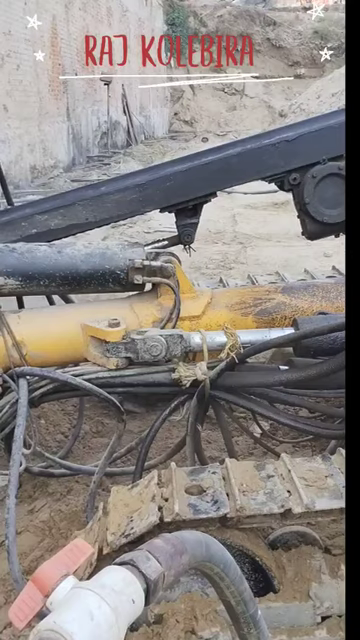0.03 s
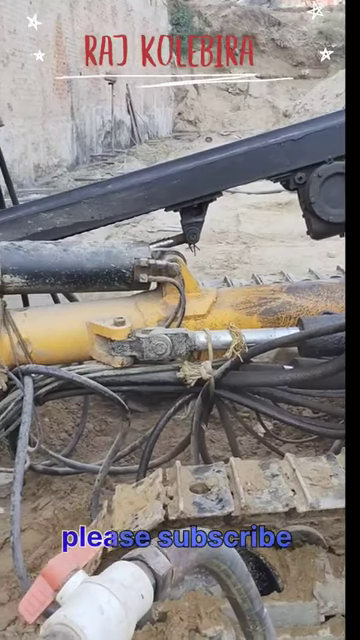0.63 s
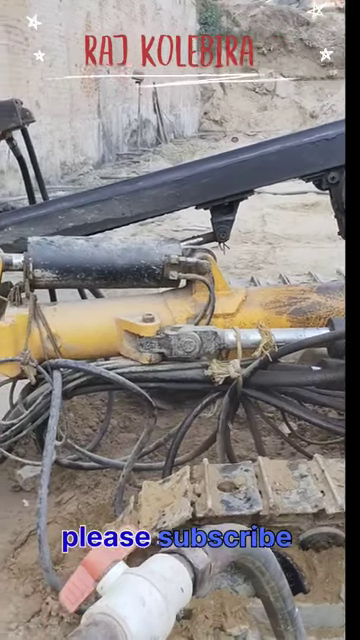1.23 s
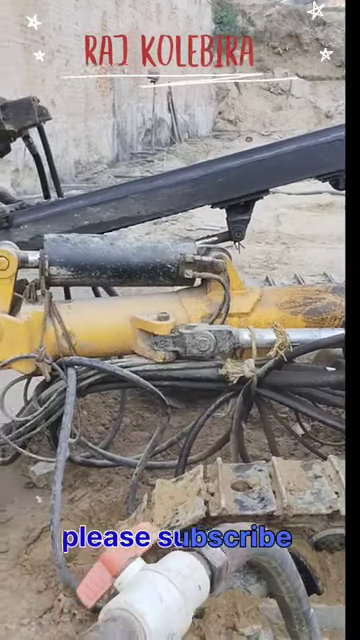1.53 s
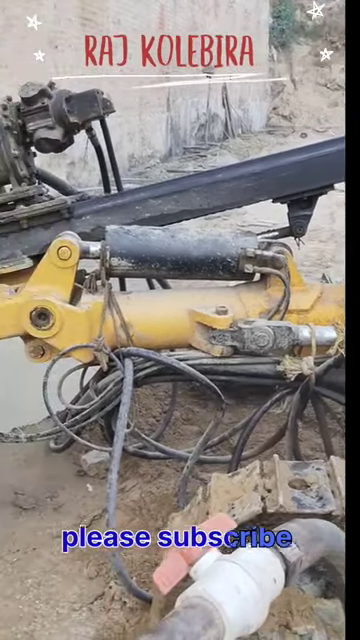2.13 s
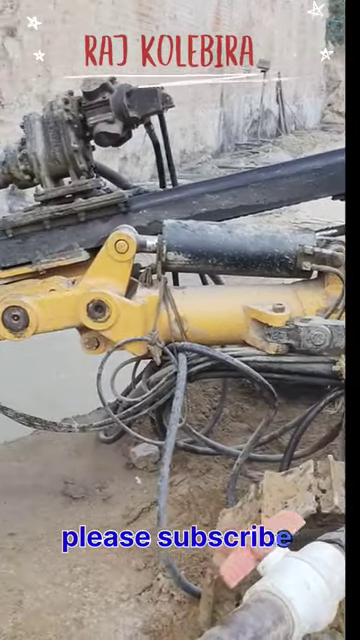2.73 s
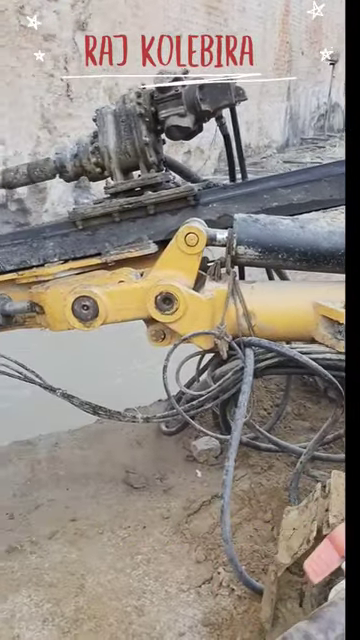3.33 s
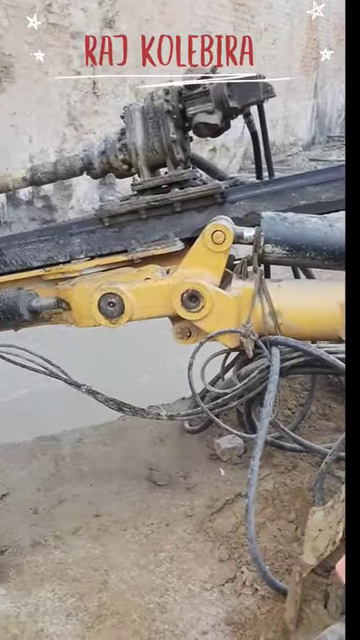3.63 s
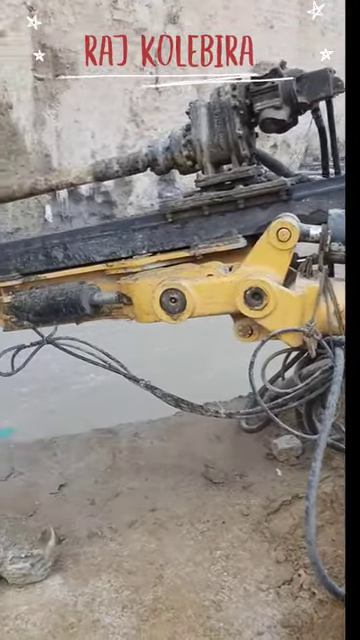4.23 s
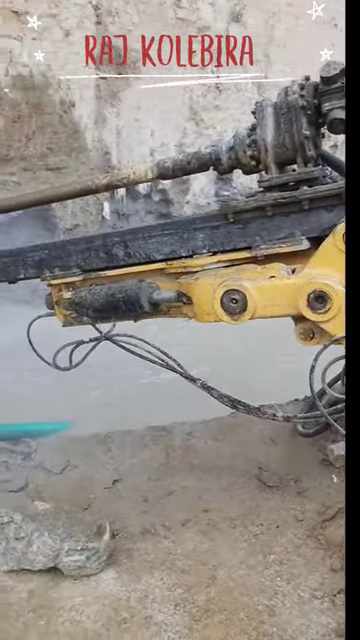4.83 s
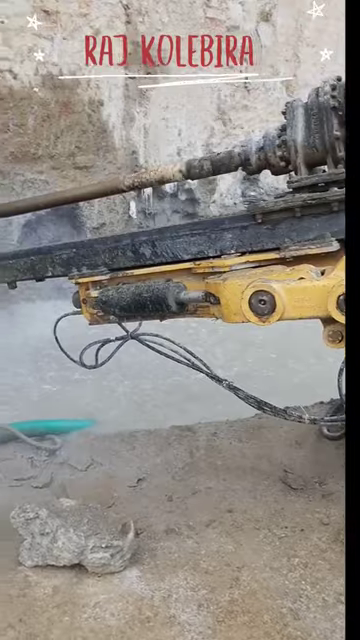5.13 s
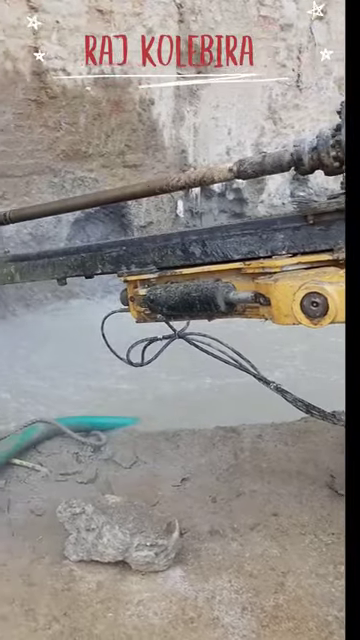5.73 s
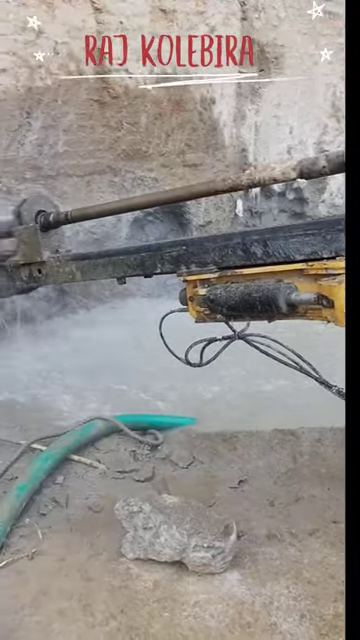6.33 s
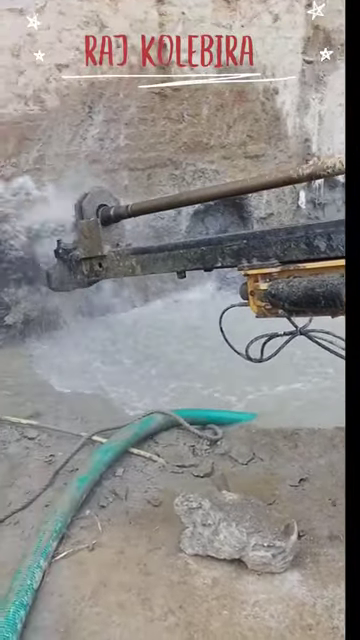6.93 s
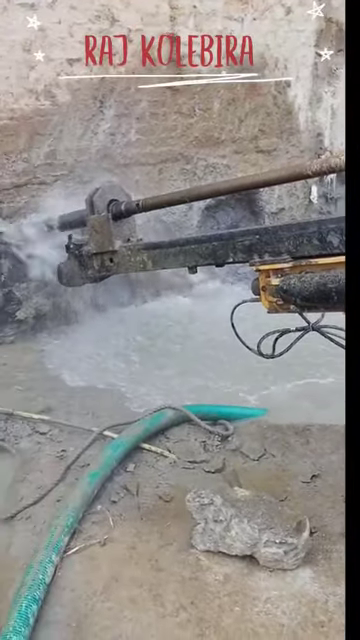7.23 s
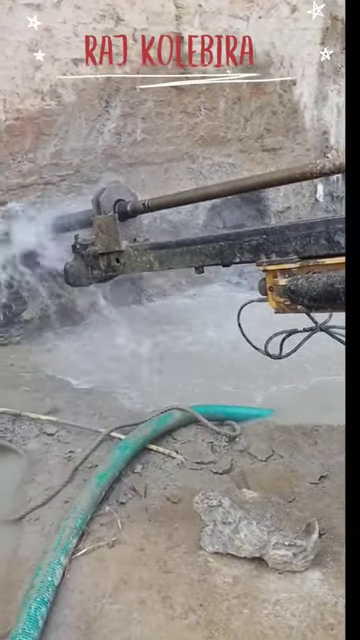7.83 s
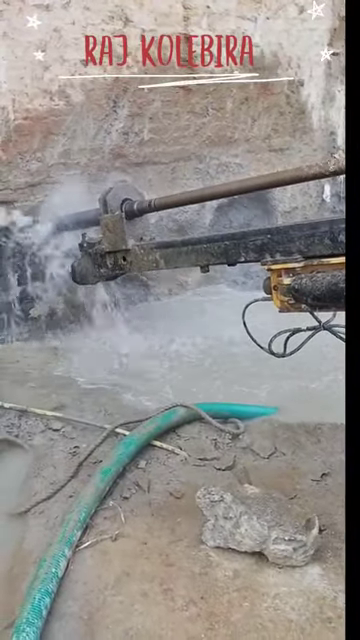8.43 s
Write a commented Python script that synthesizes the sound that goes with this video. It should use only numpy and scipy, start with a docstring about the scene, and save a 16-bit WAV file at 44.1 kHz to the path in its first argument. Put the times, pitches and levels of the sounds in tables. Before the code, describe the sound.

Fast, steady hammering of a drilling rig against a concrete wall, with rattling metal, a squeaking rod, spraying water and a rumbling engine.

```python
"""A hydraulic rock drill hammers a steel rod into a concrete wall, nearly 18 blows a second.
Each blow knocks the beam that carries the drill and sets the steelwork clattering; the piston thumps
back through the boom (the drill's arm), and the turning rod squeals in its guide. Flushing water
sprays from the hole, the engine rumbles, and the pit's walls echo. The whole sound swells once at
the start, and the listener slowly turns toward the bit."""
import sys
import numpy as np
from scipy import signal
from scipy.fft import rfft, irfft, next_fast_len
from scipy.io import wavfile
from scipy.ndimage import map_coordinates

SR = 44100
rng = np.random.default_rng(int(sys.argv[2]) if len(sys.argv) > 2 else 0)


def pcm_store(signal):
    """Save signal as 16-bit PCM."""
    levels = np.round(np.clip(np.atleast_2d(signal), -1, 1) * 32767)
    wavfile.write(sys.argv[1], SR, levels.astype(np.int16).T)


N = 378378
TIME = np.arange(N) / SR

# Loose parts rattle at the blow, and again as the piston returns.
# Each row: seconds after the blow, relative level in dB.
RATTLE_SHAPE = [(0, 2.5), (.001, -0.5), (.006, 1.5), (.021, -2.5), (.026, 1.5), (.031, -4.5), (.038, -10),
                (.057, -7.5)]
# Water spurts after a blow. Each row: seconds after the blow, relative level in dB.
SPURT_SHAPE = [(0, -19), (.002, 3), (.008, 5.5), (.027, 2.5), (.038, 0.5), (.057, -2)]


def amp(db):
    """Turn decibels into a number to multiply by."""
    return 10 ** (np.asarray(db) / 20)


def unit(x):
    """Scale a sound to an average strength (rms) of 1."""
    return x / np.sqrt(np.mean(x ** 2) + 1e-20)


def along(points, hz):
    """Read a table of frequencies and values at hz, with octaves evenly spaced."""
    table_hz, values = np.transpose(points)
    return np.interp(np.log(hz + 1), np.log(table_hz + 1), values)


def curves(rows, at=TIME):
    """Join a table's rows with straight lines: one curve for each column after the time."""
    times, *columns = np.transpose(rows)
    return [np.interp(at, times, column) for column in columns]


def wobble(rate, count=8):
    """A smooth random curve through rate new values a second."""
    knots = rng.standard_normal(int(N * rate / SR) + 4)
    steps = np.arange(len(knots) * count) / count
    return np.interp(TIME * rate, steps, map_coordinates(knots, [steps], mode="nearest"))


def each(blow):
    """A random value that holds until the next blow."""
    return rng.standard_normal(blow[-1] + 1)[blow]


def swell(start_s, rise_s, hold_s, fall_s):
    """A curve that rises from 0 to 1, holds and falls back."""
    return np.interp(TIME, start_s + np.cumsum([0, rise_s, hold_s, fall_s]), [0, 1, 1, 0])


def filtered(x, response):
    """Multiply each frequency in x by response(hz)."""
    size = next_fast_len(N + SR // 4)
    return irfft(rfft(x, size) * response(np.fft.rfftfreq(size, 1 / SR)), size)[..., :N]


def peaks(modes, hz):
    """How much power ringing parts pass at hz; each has a pitch, a width and a level."""
    return sum(amp(db) ** 2 * (hz * width) ** 2 / ((pitch ** 2 - hz ** 2) ** 2 + (hz * width) ** 2)
               for pitch, width, db in modes)


def noise(colour):
    """Stereo noise shaped by colour(hz), alike in both ears in the bass, less so in the treble."""
    # Each row: frequency in Hz, how alike the ears are (1 means the same).
    likeness = [(100, 1), (200, 1), (400, 0.82), (750, 1), (1800, 0.13), (3000, 0.076), (6000, 0.56),
                (7200, 0.37), (10000, 0.12), (15000, 0.091)]
    def response(hz):
        spread = np.arccos(np.clip(along(likeness, hz), -1, 1 - 1 / 64)) / 2
        return colour(hz) * np.array([np.cos(spread), np.sin(spread)])
    mid, side = filtered(rng.standard_normal((2, N)), response)
    return unit(np.array([mid + side, mid - side]))


def hum(hz, width, alike):
    """One part kept ringing by random small hits, in stereo."""
    common, apart = signal.lfilter(*signal.iirpeak(hz, hz / width, SR), rng.standard_normal((2, N)))
    side = np.sqrt((1 - min(alike, 1)) / (1 + alike)) * apart
    return unit(np.array([common + side, common - side]))


def panned(x, left_db, lead_s):
    """Make x louder and earlier on the left; negative values favour the right."""
    shift = lead_s * SR / 2
    ears = zip((1, -1), np.broadcast_to(x, (2, N)))
    return np.array([amp(side * left_db / 2) * map_coordinates(ear, [np.arange(N) + side * shift])
                     for side, ear in ears])


def pit_echo(x, count=30):
    """The pit's walls throw the sound back in a short, blurred echo that keeps varying at random."""
    # Each row: frequency in Hz, seconds the echo takes to fade by 60 dB.
    fade_times = [(100, 0.067), (800, 0.29), (8000, 0.36)]
    hop, length = N // count + 1, SR // 4
    out = np.zeros((2, N + 4 * hop + length))
    padded = np.pad(x, (hop, 3 * hop))
    for start in range(0, N + hop, hop):
        hz, t, spectrum = signal.stft(rng.standard_normal((2, length)), SR, nperseg=256)
        fade = amp(-60 * t / along(fade_times, hz)[:, None])
        tail = signal.istft(spectrum * fade, SR, nperseg=256)[1][:, :length]
        piece = padded[start:start + 2 * hop] * signal.windows.cosine(2 * hop)
        echo = signal.fftconvolve(piece[None], tail / np.linalg.norm(tail[0]), axes=1)
        out[:, start:start + echo.shape[1]] += echo
    return out[:, hop:hop + N]


def air_puff(peak_s=0.635, ramp_s=0.019, top_hz=85):
    """A puff of air makes one soft, low bump."""
    rumble = noise(lambda hz: 1 / (1 + (hz / top_hz) ** 4))
    return amp(-27) * rumble * swell(peak_s - ramp_s, ramp_s, 0, ramp_s)


def engine():
    """The engine rumbles, its level wavering."""
    # Each row: frequency in Hz, relative level in dB.
    spectrum = [(20, -33), (45, -33), (75, 4), (135, 2.5), (220, -0.5), (300, -2.5), (410, -10),
                (700, -1.5), (1500, -21), (5000, -11.5), (15000, -47)]
    return noise(lambda hz: amp(along(spectrum, hz))) * amp(1.6 * wobble(10))


def thump(blow, first_s=0.0011, first_gain=0.47, return_s=0.02524):
    """The boom jolts at the blow, and harder about half a cycle later when the oil reverses."""
    # Each row: frequency in Hz, relative level of the jolt in dB.
    spectrum = [(30, -39), (60, -15.5), (85, -3), (130, 1), (170, -1.5), (212, -4.5), (260, -10.5),
                (360, -18.5), (600, -41)]
    kicks = np.diff(blow, prepend=0) * amp(0.76 * each(blow))
    def two_jolts(hz):
        delays = first_gain * np.exp(-2j * np.pi * hz * first_s) + np.exp(-2j * np.pi * hz * return_s)
        return 1j * amp(along(spectrum, hz)) * delays  # 1j: each jolt both pushes and pulls the air
    return unit(filtered(kicks, two_jolts))


def boom(blow):
    """The boom thumps with the piston and drones along; the engine rumbles through it."""
    # Each row: time in seconds, relative levels of the thump and of the drone in dB.
    levels = [(1.0, -37, -46.5), (2.3, -36.5, -41), (2.8, -44.0, -45.5), (3.3, -44, -52), (5.3, -42, -52),
              (6.5, -44.5, -42.5), (6.8, -43.0, -52.5), (7.5, -43, -45.5), (8.5, -43, -49)]
    thump_db, drone_db = curves(levels)
    drone = amp(drone_db - 1) * noise(lambda hz: peaks([(296, 65, 0)], hz))
    rumble = amp(thump_db - 3) * engine()
    return amp(thump_db - 1.1) * thump(blow) + rumble + drone


def water_spray(blow, age):
    """Flushing water spurts from the hole and breaks into drops."""
    # Each row: time in seconds, relative level in dB.
    levels = [(1.0, -32), (2.2, -31), (3.6, -36.5), (4.7, -44.5), (5.2, -41), (6.5, -45.5), (6.8, -35.5),
              (7.1, -38), (7.3, -32), (7.5, -36.5), (8.3, -35.5), (8.5, -38.5)]
    # Each row: frequency in Hz, relative level of the hiss in dB.
    spectrum = [(500, -30), (2000, -3), (5000, -1.5), (8000, -3.5), (9600, -1), (11000, -0.5), (13800, 0.5),
                (15500, -6)]
    # Thin high tones: one whistles in the spray, the other rings an octave above the rod's squeal. Each row:
    # pitch in Hz, width in Hz, dB above the hiss.
    whistles = [(9640, 66, 8), (14400, 40, 11)]
    hiss = noise(lambda hz: amp(along(spectrum, hz)) * np.sqrt(1 + peaks(whistles, hz)))
    spurt_db = curves(SPURT_SHAPE, age)[0] + 1.8 * each(blow)
    drops_db = 2 * wobble(1300)
    return amp(curves(levels)[0] + 3) * unit(hiss * amp(spurt_db + drops_db))


def squeal(blow, age, pitch_hz=7157, waver_hz=45, loudest_s=0.023):
    """The rod sings while it slides in its guide between blows."""
    # Each row: pitch in Hz, width in Hz, relative level in dB.
    rod_tones = [(7114, 40, 16.5), (7060, 120, 1.5), (14250, 70, -32)]
    slide_db = 1.5 * np.cos(2 * np.pi * (age - loudest_s) / np.percentile(age, 99))
    tone = np.sin(2 * np.pi * np.cumsum(pitch_hz + waver_hz * wobble(130)) / SR)
    scrape = noise(lambda hz: np.sqrt(peaks(rod_tones, hz)) / (1 + (np.maximum(6500 - hz, 0) / 700) ** 2))
    flicker = amp(1.1 * wobble(60))
    return unit((0.5 * flicker * tone + scrape) * amp(slide_db + 2 * each(blow)))


def chirps(blow, age, start_hz=7650, climb_hz_per_s=15000):
    """The rod sticks and slips: a higher, raspy squeak climbs anew after each blow."""
    # Each row: pitch in Hz, width in Hz, relative level in dB.
    rasp_bands = [(8030, 720, 2.5), (7100, 370, -3), (5000, 270, -5), (9400, 1300, -12)]
    pitch_hz = start_hz + climb_hz_per_s * age + 170 * each(blow) + 110 * wobble(400)
    tone = np.sin(2 * np.pi * np.cumsum(pitch_hz) / SR)
    def rasp_colour(hz):
        edge_cut = 1 + (4800 / (hz + 1)) ** 12 + (hz / 10000) ** 12
        return np.sqrt(peaks(rasp_bands, hz) / edge_cut)
    squeak = 1.4 * noise(rasp_colour) + tone * amp(3 * each(blow))
    return unit(squeak * amp(curves(SPURT_SHAPE, age)[0] + 2.9 * wobble(150)))


def rubbing_rod(blow, age):
    """Squeal and chirps both grow with the rubbing, and change level whenever the rod catches."""
    # Each row: time in seconds, relative level of the rubbing in dB.
    rubbing = [(1.0, -34.5), (2.4, -30.5), (3.8, -32.5), (4.7, -41.5), (6.4, -42.0), (6.8, -39),
               (7.6, -41.5), (8.5, -39)]
    # Each row: start in seconds, length in seconds, dB added to the squeal, dB added to the chirps.
    catches = [(1.56, 0.41, 5, -1), (2.03, 0.086, 8.5, -2), (2.28, .1, -1, 3.5), (2.53, 0.11, 2, 2.5),
               (3.156, 0.083, 8, 2.5), (4.0, 0.16, 7, -0.5), (4.853, .39, 10, 0), (6.706, 0.22, 9.5, 1),
               (7.174, 0.11, 6.5, 2)]
    rise_s, fall_s = 0.065, 0.091
    swells = np.array([swell(start - rise_s, rise_s, length, fall_s) for start, length, _, _ in catches])
    squeal_db, chirp_db = curves(rubbing)[0] + np.transpose(catches)[2:] @ swells
    return amp(squeal_db - 1) * squeal(blow, age) + amp(chirp_db) * chirps(blow, age)


def clatter(blow, age):
    """Couplings, chain and guides rattle in a dense burst of small hits after every blow."""
    # Each row: frequency in Hz, relative level of the hits in dB.
    spectrum = [(150, -23), (300, -3), (430, -2.5), (700, 4), (1250, -2.5), (2000, -10), (2700, -1.5),
                (4500, -8.5), (7000, 1.5), (9500, -6), (15000, -11.5)]
    # The loose parts ring. Each row: pitch in Hz, width in Hz, relative level in dB.
    steel_tones = [(2410, 130, 1), (2946, 300, 4), (3240, 92, 2), (3810, 320, 2), (4370, 170, 1),
                   (5360, 120, 5), (6025, 42, 10)]
    hits = noise(lambda hz: amp(along(spectrum, hz)))
    # Which part rings most drifts as the rod turns.
    ringing = sum(amp(db + 2 * each(blow) + 0.63 * wobble(0.93))
                  * np.sqrt(width) * hum(hz, width, alike=0.4) for hz, width, db in steel_tones)
    burst = amp(curves(RATTLE_SHAPE, age)[0] + 1.7 * each(blow))
    return unit((hits + amp(-2.5) * unit(ringing)) * burst)


def clank(blow, age):
    """Each blow shakes the boom's plates in a slightly different mix."""
    # Each row: pitch in Hz, width in Hz, relative level in dB.
    plate_tones = [(1134, 38, 0), (1398, 180, 4), (1562, 91, 2), (1749, 45, 3.5), (1965, 160, -0.5)]
    # Each row: seconds after the blow, relative level in dB.
    shudder = [(0, -5), (.0015, 3), (.006, 3), (.012, -2.5), (.021, -4), (.027, -0.5), (.036, -9.5),
               (.057, -12.5)]
    plates = sum(amp(db + each(blow)) * np.sqrt(width) * hum(hz, width, alike=0.71)
                 for hz, width, db in plate_tones)
    return unit(plates * amp(curves(shudder, age)[0]))


def steelwork(blow, age, surge):
    """Plates clank, loose parts clatter, and the rod's coupling rings, more or less as it turns."""
    # Each row in both tables: time in seconds, relative level in dB.
    clank_levels = [(1.0, -40.5), (1.7, -36.5), (2.1, -40), (2.5, -35.0), (3.3, -44), (3.9, -38.5),
                    (4.4, -43.5), (5.2, -42.5), (5.6, -39.0), (6.0, -43.5), (6.6, -42), (7.9, -42),
                    (8.5, -48)]
    clatter_levels = [(1.0, -31), (3.0, -30.5), (4.7, -39), (5.2, -38.0), (6.5, -40), (6.8, -37),
                      (7.3, -36), (7.8, -37), (8.5, -36)]
    clank_db = curves(clank_levels)[0] + 3.5 * surge
    clatter_db, = curves(clatter_levels)
    coupling = hum(2285, 53, alike=0.59)
    coupling *= amp(curves(RATTLE_SHAPE, age)[0] + 2 * each(blow) + 2.7 * wobble(4))
    loose_parts = amp(clatter_db + 2.5) * clatter(blow, age) + amp(clatter_db - 10) * unit(coupling)
    return loose_parts + amp(clank_db) * clank(blow, age)


def ring(modes, blow, age, scatter_db, detune, rise_s):
    """A struck part's tones build up fast and fade, a little differently at each blow."""
    tone = sum(amp(db + scatter_db * each(blow) - 60 * age / fade_s)
               * np.sin(2 * np.pi * hz * (1 + detune * each(blow)) * age) for hz, db, fade_s in modes)
    attack = 1 - np.exp(-age / rise_s)
    release = np.clip((age.max() - age) / 0.006, 0, 1)
    return unit(tone * attack * release)


def hammer(first_s=0.41507, period_s=0.05663):
    """The hammer's beat: for every sample, the latest blow's number and its age in seconds."""
    # It labours twice and catches up. Each row: time in seconds, seconds behind the beat.
    lag = [(.47, 0), (1, .0018), (1.44, .005), (2.23, .0056), (3.1, .0015), (4.5, .0019), (5.06, .0054),
           (5.35, .0094), (5.69, .0085), (6.45, .0023), (7.8, 0)]
    beats = np.arange(first_s, TIME[-1], period_s)
    times = beats + curves(lag, beats)[0]
    blow = np.maximum(np.searchsorted(times, TIME) - 1, 0)
    return blow, np.maximum(TIME - times[blow], 0)


def knock(blow, age, round_trips_per_s=752):
    """The blow bounces between the rod's ends and rings the beam, the drill's cradle and the bit."""
    # Each row: time in seconds, then relative levels in dB of the whole knock, its cradle and its bit.
    levels = [(1.0, -31, -8, -12), (2.0, -33.5, -7, -3), (2.8, -34.5, -8.0, -8.5), (3.1, -37, -8.5, -8),
              (4.0, -35, -2.5, -6), (4.3, -38, -6.5, -11), (4.7, -36.5, -14, -9.5), (4.9, -39, -9.5, -6.5),
              (6.4, -34.5, -10.5, -12), (6.7, -35.5, -2.5, -7), (8.5, -33.5, -9.0, -2)]
    # The bit's ring sinks and recovers as it settles in. Each row: time in seconds, pitch in Hz.
    bit_pitch = [(1.7, 1105), (2.4, 1044), (4.2, 1023), (4.8, 940), (5.5, 930), (6.4, 1133), (8.5, 1084)]
    # The wave in the rod dies away. Each row: seconds after the blow, relative level in dB.
    wave_fade = [(0, 0), (.0035, -0.5), (.005, 0), (.007, -7), (.009, -14), (.014, -17), (.022, -23),
                 (.057, -36)]
    # Each row: pitch in Hz, relative level in dB, seconds to fade by 60 dB.
    beam_tones = [(684, 6, 0.031), (767, -2.5, 0.05), (815.6, -3, 0.11)]
    knock_db, cradle_db, bit_db = curves(levels)
    bit_hz, = curves(bit_pitch)
    cradle_tones = [(601.5, 0, 0.04)]
    bit_tones = [(bit_hz, 0, 0.055), (bit_hz * 0.95, -3, 0.045)]
    phase = 2 * np.pi * round_trips_per_s * (1 + 0.022 * each(blow)) * age
    wave = unit(np.sin(phase) * amp(curves(wave_fade, age)[0] + 0.3 * each(blow)))
    beam = ring(beam_tones, blow, age, scatter_db=3, detune=0.029, rise_s=0.0038)
    cradle = ring(cradle_tones, blow, age, scatter_db=1.5, detune=0.017, rise_s=0.0068)
    bit = ring(bit_tones, blow, age, scatter_db=1.5, detune=0.026, rise_s=0.005)
    ringing = amp(-10) * beam + amp(cradle_db - 2.5) * cradle + amp(bit_db - 2.5) * bit
    direct = amp(knock_db) * (amp(-2) * wave + ringing)
    return panned(direct, left_db=-0.3, lead_s=0.00013) + amp(-6) * pit_echo(direct)


def scene():
    """The drill's layers share the hammer's beat and the opening swell."""
    # The listener turns. Each row: time in seconds, the left ear's head start in seconds.
    bearing = [(.5, 7.5e-5), (1.5, 6e-5), (2.5, 3.5e-5), (3.7, -1e-5), (5.5, -3.5e-5), (7.5, -6.5e-5)]
    lead_s, = curves(bearing)
    blow, age = hammer()
    surge = swell(start_s=0.31, rise_s=0.25, hold_s=0.19, fall_s=0.26)
    water = water_spray(blow, age)
    steel = panned(steelwork(blow, age, surge), left_db=-0.2, lead_s=lead_s)
    water_and_rod = panned(water + rubbing_rod(blow, age), left_db=2.5, lead_s=lead_s)
    drilling = knock(blow, age) + steel + water_and_rod
    return amp(11 * surge) * drilling + amp(10.5 * surge) * boom(blow) + air_puff()


def record(dry):
    """The sound cuts in suddenly, its tallest peaks are flattened and the highest treble is removed."""
    start_s, ceiling, top_hz = 0.4295, 0.9, 15550
    clipped = np.clip(dry * (TIME > start_s), -ceiling, ceiling)
    return filtered(clipped, lambda hz: hz < top_hz)


dry = scene()
out = record(dry)
pcm_store(out)
```